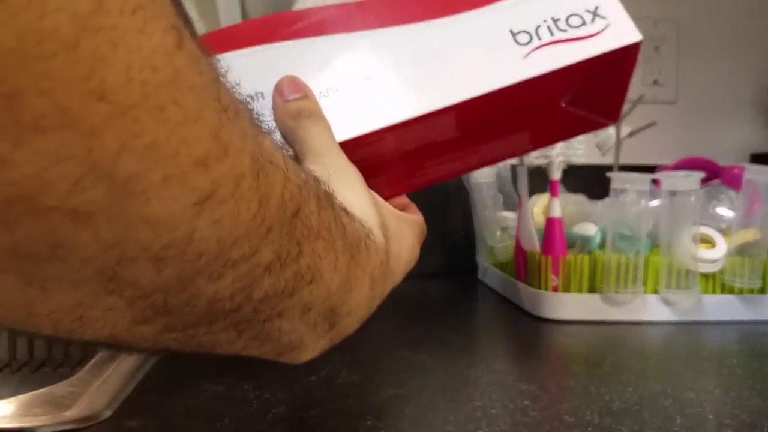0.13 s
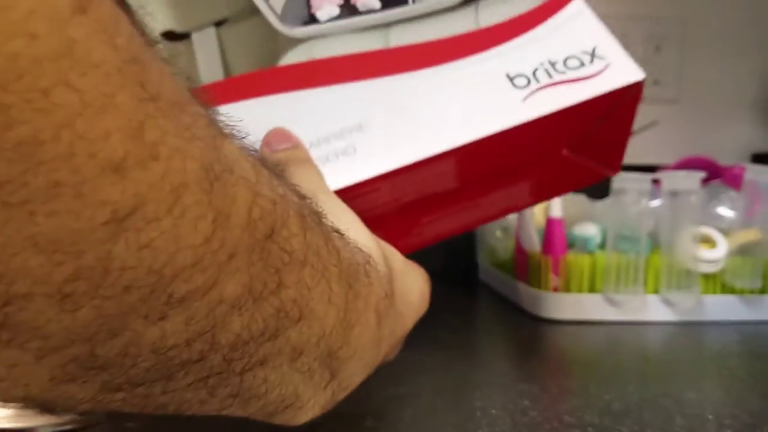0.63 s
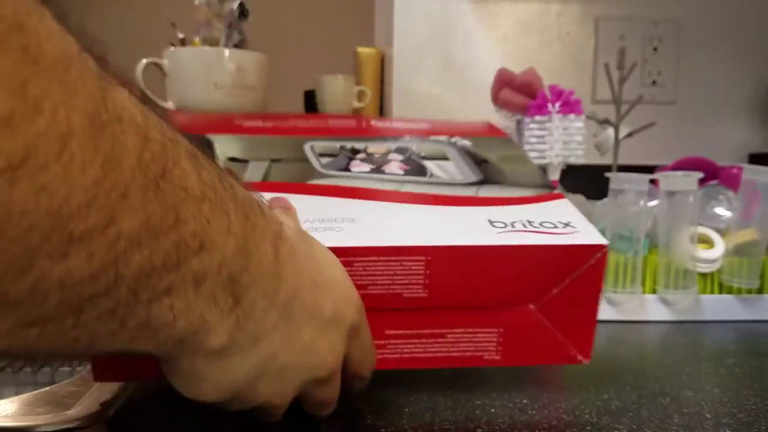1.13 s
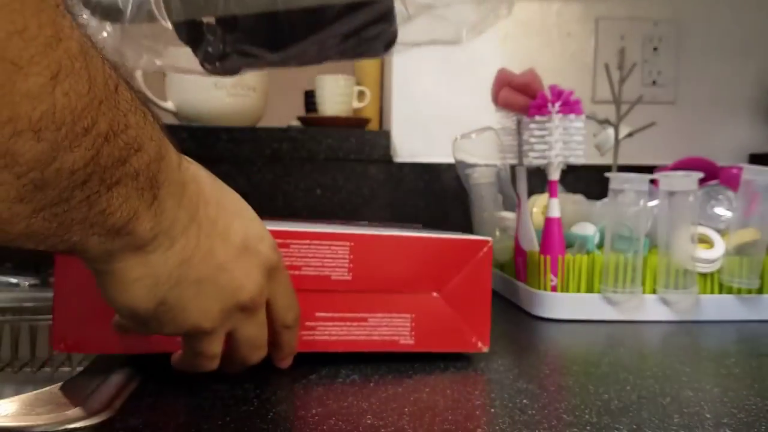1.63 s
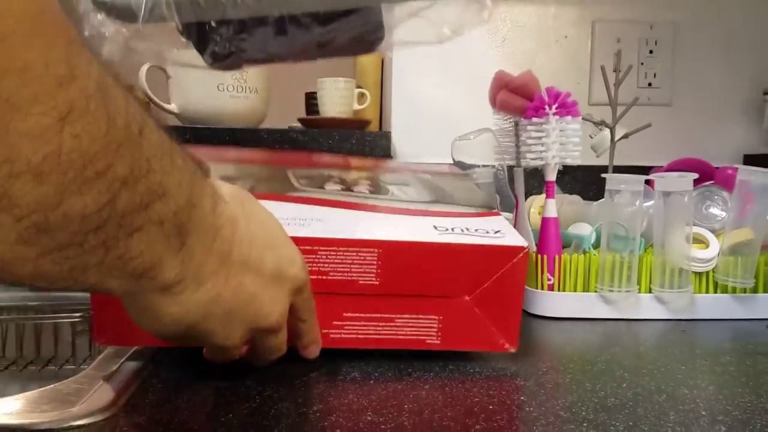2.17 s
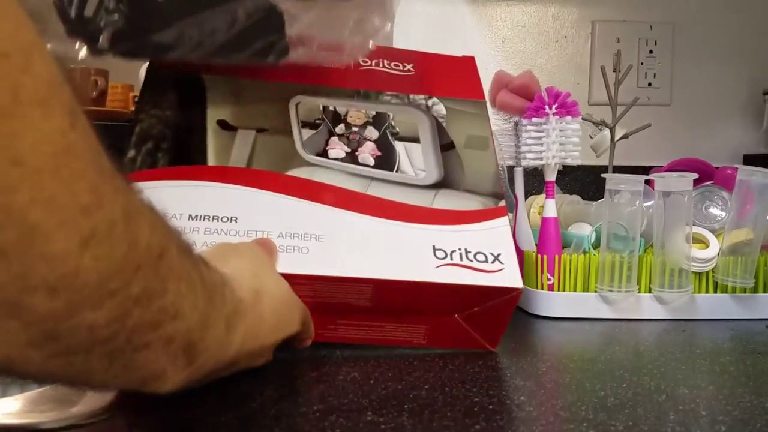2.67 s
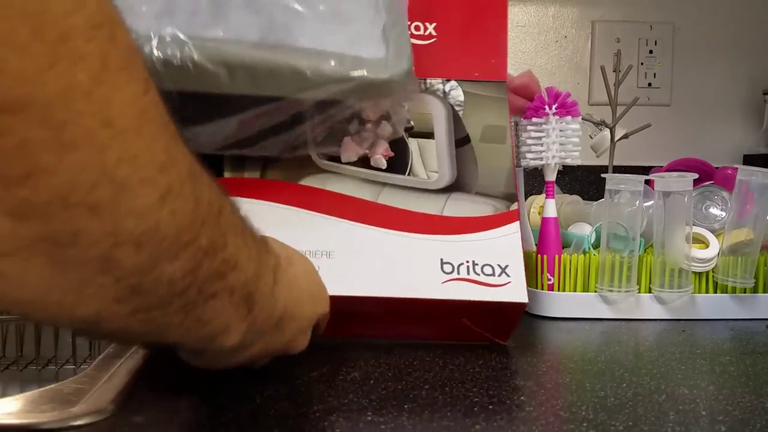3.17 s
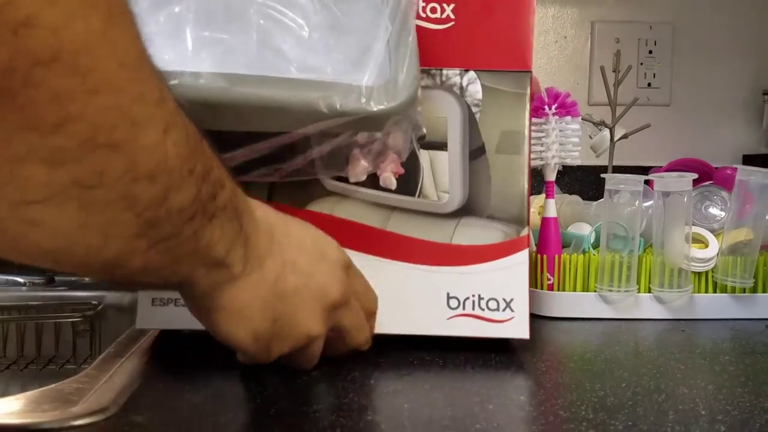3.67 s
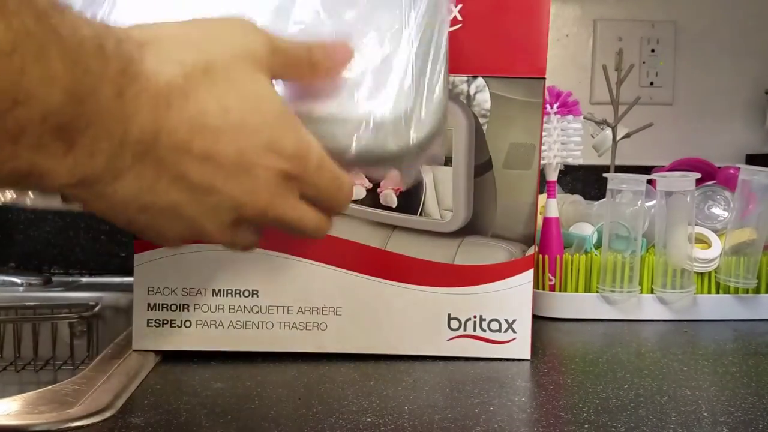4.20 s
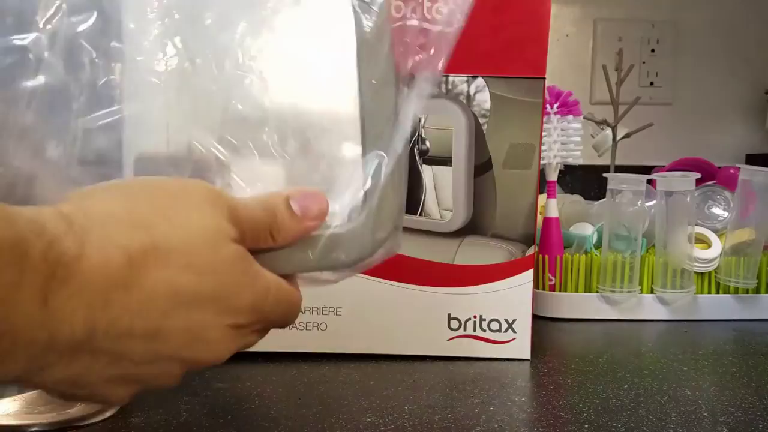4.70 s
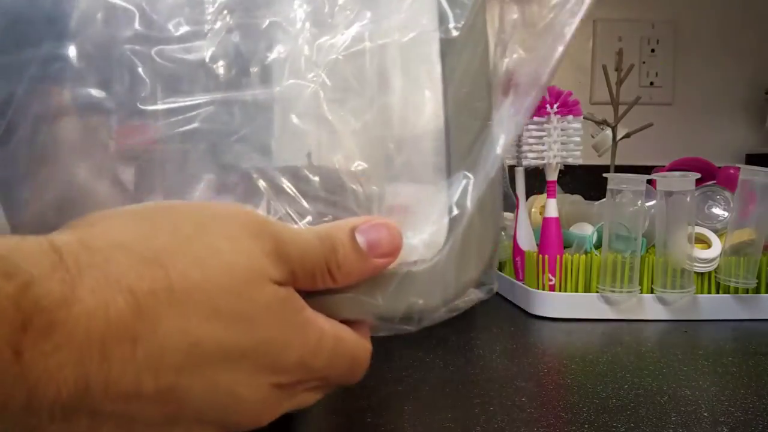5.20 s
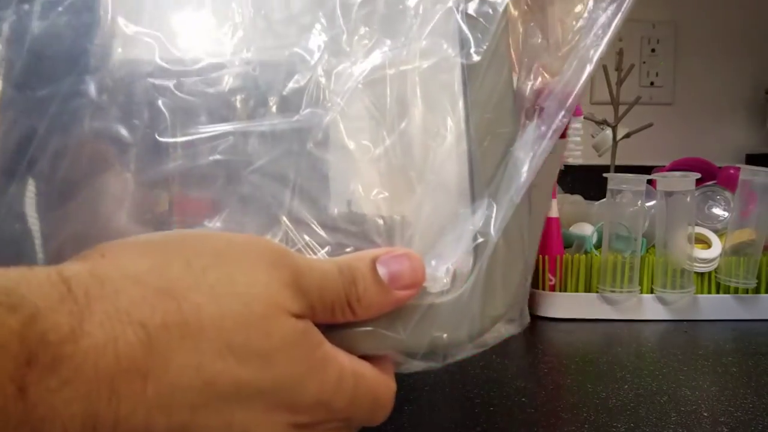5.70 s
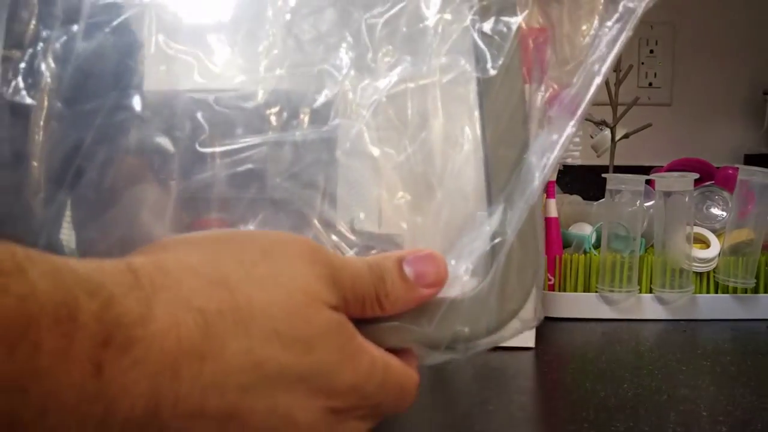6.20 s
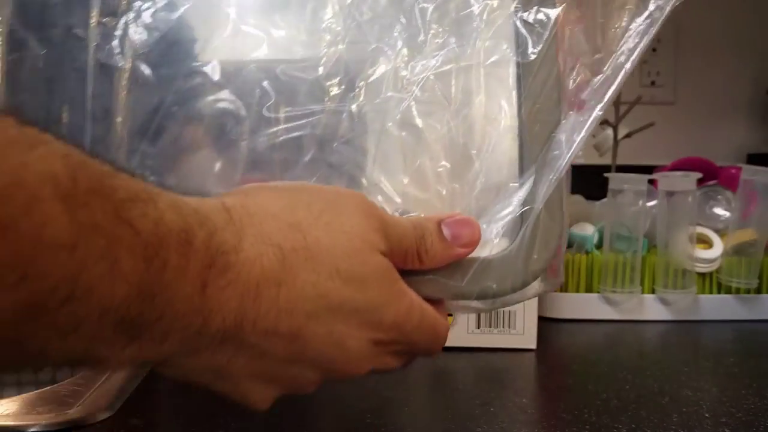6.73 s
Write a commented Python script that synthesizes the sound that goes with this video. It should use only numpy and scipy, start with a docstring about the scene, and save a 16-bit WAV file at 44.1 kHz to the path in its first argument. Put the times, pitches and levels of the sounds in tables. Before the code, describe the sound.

A cardboard box scrapes and knocks firmly onto a hard kitchen counter, then lighter taps, rubbing, crackling plastic film and one late hard knock.

```python
"""A cardboard box is slid off a bagged object, set down, tipped and nudged on a stone kitchen counter.
Sliding hiss and light knocks come first, then firm blows up to 1.8 s, from decaying sines of the box panels.
Quieter knocks and rubbing follow, as gritty noise through those modes; film snaps, short noise puffs,
crowd in from 4.1 to 4.9 s, and one more hard blow falls near 5.7 s before the handling dies down.
Stiff edges sing in filtered bursts; low noise rumbles, sparse echoes make the room, steady noise the hush."""
import sys
import numpy as np
from scipy import signal
from scipy.fft import rfft, irfft
from scipy.io import wavfile
from scipy.ndimage import uniform_filter1d

SR = 44100
rng = np.random.default_rng(int(sys.argv[2]) if len(sys.argv) > 2 else 0)


def boost(x):
    """Linear amplitude factor 10**(x/20) for a level x in decibels (scalar or array-like)."""
    u = np.asarray(x, float) / 20
    return 10 ** u


def master_out(mix):
    """Clip the mix to full scale and print it as 16-bit PCM to the path in sys.argv[1]."""
    frames = np.transpose(np.atleast_2d(mix))
    ceiling = np.clip(frames, -1, 1)
    pcm = np.round(ceiling * 32767).astype(np.int16)
    wavfile.write(sys.argv[1], SR, pcm)


N = 302085  # length in samples

# Panel and cavity modes of the box: mode_hz, relative level_db, longest t60_s
MODES = [(102, -15.5, 0.1), (128, -6, 0.037), (158.9, -15, .15), (207.7, -11, 0.11), (270, -7, 0.11),
         (324, -1, 0.045), (349.5, 1, 0.07), (393.2, 1, 0.077), (481.3, 5, 0.18), (488.7, 3.5, 0.16),
         (587, 5.5, 0.03), (700, -1, 0.14), (795, 3.5, 0.068), (880, 2.5, 0.038), (1025, 9, 0.014),
         (1194, 9.5, 0.12), (1206.5, 13.5, 0.015), (1404, 6, 0.051), (1597, 7, 0.025), (1735, 4.5, 0.047),
         (1956, 3.5, 0.025), (2050, -10, .03), (2128, 2.5, 0.019), (2540, 5, 0.04), (2595, 5, 0.041),
         (2986, -4.5, .02), (3350, -4.5, .02), (3530, -11.5, .012), (4300, -9, .008)]
# Blows on the box: start_s, panel level_db before the mix, thump_db and edge_db above the panel, favoured mode_hz
BLOWS = [(0.246, -36.5, 5, 0, 185), (0.368, -43, -9, -30, 405), (0.417, -34, -14, -4, 824),
         (0.452, -36, -7, -12, 330), (0.471, -17.5, -8.5, -12.5, 408), (0.641, -32.5, -11, -16, 384),
         (0.91, -26.5, -44, -2.5, 480), (1.04, -20, -9.5, -4.5, 293), (1.053, -25, -13, -4, 627),
         (1.081, -59, -29, -11, 473), (1.133, -26, -11, -6.5, 640), (1.168, -31.5, -7, -3, 344),
         (1.5, -11.5, -11.5, -2.5, 420), (1.515, -16.5, -10.5, 6, 554), (1.539, -21, -8, -13, 305),
         (1.64, -23, -8, -3, 436), (1.714, -27.5, -12, -2, 725), (1.739, -25.5, -34, -20, 490),
         (2.155, -52, -37, -2, 950), (2.223, -49, -9, -0.5, 885), (2.348, -37, -4.5, -2.5, 366),
         (2.413, -41, -6, -6, 595), (2.553, -54.5, 9, 14.5, 370), (2.768, -58.5, -14, 12, 895),
         (2.878, -66.5, -15, 18, 795), (2.918, -48.5, -28, -8, 750), (2.988, -36.5, -0.5, -5, 360),
         (3.057, -62, -15, 3, 587), (3.084, -35.5, -27, -2.5, 377), (3.281, -26.5, -12.5, -48, 464),
         (3.32, -37, -28, 0, 385), (3.402, -49.5, -1, 8, 388), (3.499, -48, -24, 3, 395),
         (3.557, -51, -19, 14, 870), (3.64, -41.5, -10.5, -13, 404), (3.665, -46.5, -20, -17, 413),
         (3.869, -49.5, -16, 10.5, 1720), (3.9, -47, -6.5, -30, 312), (4.009, -52, -3.5, -20, 600),
         (4.147, -43.5, -15, 12, 940), (4.212, -43.5, -31, 7.5, 940), (4.262, -41, -47, 1, 627),
         (4.288, -43.5, -34, 5, 750), (4.566, -47.5, -36, 15.5, 579), (4.76, -50, -24, 12, 855),
         (4.847, -37, -9, 2, 567), (4.871, -45, -29, -22, 533), (4.9, -39.5, -4.5, 1, 270),
         (4.964, -42.5, -22, -24, 409), (5.013, -31, -30, -12, 324), (5.13, -46, 5, 6, 466),
         (5.14, -28.5, -1.5, -26, 440), (5.165, -41.5, 8, -9, 128), (5.337, -40, 0.5, -29, 302),
         (5.365, -54, 11, -8.5, 128), (5.514, -51, -18, -21, 397), (5.684, -11, -54, -9, 470),
         (5.72, -18.5, -24, -24, 388), (5.749, -22.5, -48, -17, 473), (5.78, -37, -16, -23, 374),
         (6.15, -46, 6.5, -18, 143), (6.236, -48.5, 1.5, -15, 326)]
# Spectral shape of the plastic film's hiss: frequency_hz, relative density_db (per Hz)
FILM_SHAPE = [(2000, -1), (3400, -0.5), (5180, -5.5), (11200, -5), (14300, -6)]
# Left-right likeness, high in the bass: frequency_hz, likeness (0 to 1)
LIKENESS = [(60, 0.73), (300, 0.95), (700, 0.66), (1400, 0.15), (4000, .05)]


def evened(x):
    """Scales to rms 1."""
    return x / np.sqrt(np.mean(x ** 2) + 1e-20)


def smooth(x, size):
    """Two running means of size samples leave only slow movement."""
    return uniform_filter1d(uniform_filter1d(x, size=size), size=size)


def read(points, hz):
    """Reads a table on a log-frequency axis."""
    f, value = np.transpose(points)
    return np.interp(np.log(hz + 1), np.log(f + 1), value)


def colour(x, points):
    """Filters by a spectrum in dB, then scales to rms 1."""
    size = x.shape[-1]
    hz = np.fft.rfftfreq(size, 1 / SR)
    return evened(irfft(rfft(x) * boost(read(points, hz)), size))


def paired(pair):
    """Makes the right channel resemble the left in the bass."""
    size = pair.shape[1]
    same = np.clip(read(LIKENESS, np.fft.rfftfreq(size, 1 / SR)), 0, 1)
    left, other = rfft(pair)
    right = same * left + np.sqrt(1 - same ** 2) * other
    return irfft(np.array([left, right]), size)


def add(mix, start_s, sound):
    """Places a two-channel sound in the mix."""
    part = mix[:, round(start_s * SR):][:, :sound.shape[1]]
    part += sound[:, :part.shape[1]]


def grit(per_s, spread_db, clump_db):
    """Tiny catches of rough surfaces: sparse clicks of uneven size that swell in clumps, rms 1."""
    size = boost(spread_db * np.minimum(rng.exponential(1, (2, N)), 4))
    size *= rng.choice([-1., 1.], (2, N))
    clumps = evened(smooth(rng.standard_normal(N), 300))
    happens = rng.random((2, N)) < per_s / SR
    return evened(size * boost(clump_db * clumps) * happens)


def resonate(x, hz, width_hz):
    """A resonance of gain 1 that follows the curve hz: shift down, low-pass, shift back up."""
    turn = np.exp(2j * np.pi * np.cumsum(hz) / SR)
    r = np.exp(-np.pi * width_hz / SR)
    return 2 * (turn * signal.lfilter([1 - r], [1, -r], x / turn)).real


def rings(bend, turn):
    """One decaying sine per mode (bend: relative detuning by the grip, turn: phase); its share per region."""
    # centres of the thump, panel and edge regions: centre_hz
    region_hz = (150, 480, 1700)
    hz, db, t60_s = np.transpose(MODES)[:, :, None]
    t = np.arange(SR // 8) / SR
    share = np.array([read(list(zip(region_hz, row)), hz[:, 0]) for row in np.eye(3)])
    # neighbours swing in opposite sense, which fills the gaps between them
    share *= (-1.) ** np.arange(len(MODES))
    wave = np.sin(2 * np.pi * hz * (1 + bend[:, None]) * t + turn[:, None])
    wave *= 1 - np.exp(-t * hz * 4)  # the contact takes a quarter cycle
    most_cycles = 28  # card damps its ringing: caps each mode's t60
    decay_db = -60 * t / np.minimum(t60_s, most_cycles / hz)
    return boost(db + decay_db) * wave, share


def knocks():
    """A blow, then chatter of the loose flaps, rings the box; every spot of contact favours other modes."""
    chatter_db, chatter_fade_s = -38, 0.019  # fade is a time constant
    out, t = np.zeros((2, N)), np.arange(SR // 10) / SR
    hz = np.array(MODES)[:, 0]
    apart = np.arccos(np.clip(read(LIKENESS, hz), 0, 1)) / 2  # the ears meet the upper modes out of step
    spots = rng.standard_normal((len(BLOWS), 2, len(MODES)))
    chatter = rng.standard_normal((len(BLOWS), 2, len(t))) ** 3
    for (start_s, db, thump_db, edge_db, loud_hz), spot, shake in zip(BLOWS, spots, chatter):
        near = np.exp(-(np.log2(hz / loud_hz) / .3) ** 2)  # .3: width in octaves
        favour = boost(5 * near + 1.2 * spot[0])
        ears = [rings(0.029 * spot[1], side * apart) for side in (1, -1)]
        regions = np.array([(share * favour) @ ring for ring, share in ears])
        force = boost(chatter_db) * paired(shake) * np.exp(-t / chatter_fade_s)
        force[:, 0] = 1  # the blow itself
        regions = signal.fftconvolve(regions, force[:, None], axes=2)
        regions /= abs(regions).max(2).mean(0)[:, None]
        add(out, start_s, boost(db + np.array([thump_db, 0, edge_db])) @ regions)
    return out


def rubbing():
    """Gritty friction shakes the box modes; wide sliding surfaces hiss apart in the two ears."""
    (film, edge, panel), thump = strokes(), weight()
    ring, share = rings(*np.zeros((2, len(MODES))))
    catches = paired(grit(1500, 2.5, clump_db=1.0))
    # the edge contact is coloured by a wandering broad peak
    wander = evened(smooth(rng.standard_normal(N), 3000))
    scrape_hz = 1550 * np.exp(0.068 * wander)
    slips = np.gradient(grit(890, 1.3, clump_db=3.0), axis=1)
    scrape = resonate(resonate(slips, scrape_hz, width_hz=1000), scrape_hz, width_hz=1500)
    body = boost(-2.5) * edge * evened(scrape)
    for force, region in zip((thump, panel, boost(-5.0) * edge), share @ ring):
        response = region[None] / np.linalg.norm(region)
        body += signal.oaconvolve(force * catches, response, axes=1)[:, :N]
    creases = 0.37 * grit(110, 2.4, clump_db=3.0)  # sparse sharp crackles of the folding film
    rustle = grit(9000, 1.9, clump_db=1.0) + 0.95 * rng.standard_normal((2, N))
    hiss = colour(creases + rustle, FILM_SHAPE)
    return boost(-0.5) * body + boost(5.0) * film * hiss


def strokes():
    """Film, edge and panel gains: strokes rise, drift and fall, powers add; they stick and slip unevenly."""
    # slides of hand, card or bag: start_s, length_s, film level_db before the mix,
    # change_db by the end, panel_db above the film
    slides = [(0.0, 0.33, -57, -9, 8), (0.132, .11, -56.5, 6, 6), (0.448, 0.19, -43, -1, 8),
              (0.67, 0.26, -49.5, 6.5, 3), (1.09, 0.26, -64, -23, 13.5), (1.295, .18, -78.5, 5, 7.5),
              (1.524, 0.022, -45, -6.5, 8), (1.644, 0.021, -53.5, -7, -10), (1.721, 0.092, -56.5, -5.5, 10),
              (1.82, 0.03, -68, 3, 11.5), (1.873, 0.15, -58, 3.5, 6.5), (2.322, 0.16, -69, -3.5, 18.5),
              (2.514, 0.067, -60.5, 6.5, -0.5), (2.638, 0.2, -75.5, 1.5, 2), (2.951, 0.052, -50.5, -8, -5),
              (3.017, 0.13, -70, 2, 17), (3.102, 0.36, -61.5, 5.5, 4), (3.475, 0.23, -62, -1.5, 4),
              (3.871, 0.021, -61, -5.5, 1), (4.018, 0.075, -63.5, 5, 4.5), (4.156, 0.11, -52, -4, -0.5),
              (4.296, 0.18, -48, 8.5, -0.5), (4.48, 0.14, -48.5, -0.5, -4), (4.774, 0.025, -51, -9, -12),
              (4.802, 0.028, -71.5, 8, 15), (4.852, 0.075, -43, -14, -7), (4.97, 0.077, -66, -1.5, 13.5),
              (5.151, 0.071, -48.5, -11.5, 6), (5.24, 0.022, -63, -3.5, 7), (5.347, 0.15, -63, -8, 3),
              (5.52, 0.071, -63.5, -5.5, -1), (5.636, .04, -68, 6, 10), (5.694, 0.12, -47.5, -10, 4.5),
              (5.865, 0.083, -72.5, -6, 11), (6.155, 0.13, -71, -3.5, 12)]
    rise_db_per_s, fall_db_per_s = 598, 227.5  # a slide starts faster than it stops
    rest_db = -74.5  # resting hands still stir
    t = np.arange(0, N, 64) / SR
    start_s, length_s, db, change_db, panel_db = np.transpose(slides)[:, :, None]
    drift_db = change_db * np.clip((t - start_s) / length_s, 0, 1)
    before_db = rise_db_per_s * np.maximum(start_s - t, 0)
    after_db = fall_db_per_s * np.maximum(t - start_s - length_s, 0)
    film_db = db + drift_db - before_db - after_db
    judder = boost(1 * evened(smooth(rng.standard_normal((2, len(t))), 9)))  # 1 dB rms
    edge_db = 2.5 + 0.53 * panel_db  # edges scrape above the film, plus a share of the press on the panels
    gains = []
    for k, above_db in enumerate((0, edge_db, panel_db)):
        gain = np.sqrt((boost(film_db + above_db) ** 2).sum(0) + boost(rest_db) ** 2)
        gains.append(np.interp(np.arange(N) / SR, t, gain * judder[k % 2]))
    return gains


def weight():
    """Gain of the weight as the box is held and shifted in the hands."""
    # time_s, weight level_db before the mix
    shifts = [(0, -56.5), (.4, -60), (.57, -55), (.75, -52.5), (1.2, -53), (1.42, -66), (1.55, -58),
              (1.74, -63), (1.9, -97), (3.181, -58), (3.402, -67.5), (4.6, -88), (4.94, -66), (5.7, -74),
              (5.841, -59), (6.001, -78), (6.85, -74.5)]
    return boost(np.interp(np.arange(N) / SR, *np.transpose(shifts)))


def snaps():
    """Film and card edges snap: a sharp tick with a short puff of film hiss, each with its own treble tilt."""
    # start_s, level_db before the mix, treble tilt_db reached at 12 kHz
    snap_list = [(0.433, -50, -14), (0.9415, -24, 0), (1.0405, -48, -25), (1.112, -43.5, 22.5),
                 (1.167, -62, -20), (1.499, -19.5, 2), (1.5255, -33, -7), (1.5377, -30, 3), (1.64, -39, 0),
                 (1.713, -32.5, 8), (2.346, -47, 7), (2.533, -47, -27), (2.556, -38.5, -12),
                 (2.6741, -44.5, -6), (2.9517, -38, -8), (3.0584, -48, -17), (3.4029, -35, -6),
                 (3.533, -41, -20), (3.5602, -38, -18), (3.8716, -33, -16), (4.016, -54, 3),
                 (4.102, -41, -16), (4.147, -30, 3), (4.1596, -33, -9), (4.2006, -32.5, -10),
                 (4.2662, -30, 3), (4.278, -34, -25), (4.293, -34, 7), (4.3496, -28.5, -11),
                 (4.369, -25.5, 4), (4.4255, -36, -11), (4.497, -27, -5), (4.3995, -26, -7),
                 (4.468, -33, -12), (4.4798, -24.5, -12), (4.552, -49, -4), (4.568, -25, 4),
                 (4.589, -32, -20), (4.6473, -32, 7), (4.689, -36.5, -10), (4.7413, -35.5, 6),
                 (4.7598, -33.5, -1), (4.8477, -23.5, 3), (5.0785, -44, -13), (5.1336, -30, -4),
                 (5.2435, -38.5, -17), (5.529, -44, -26), (5.685, -38.5, -20)]
    out, t = np.zeros((2, N)), np.arange(4096) / SR
    tick_fade = np.exp(-t / 0.0002)
    puff_fade = boost(-60 * t / 0.076)  # t60 in s
    puffs = colour(rng.standard_normal((len(snap_list), 2, len(t))), FILM_SHAPE)
    for (start_s, db, tilt_db), puff in zip(snap_list, puffs):
        puff = colour(puff, [(7000, 0.0015), (12000, tilt_db)])
        tick = .6 * tick_fade * puff[0]  # the same in both ears
        add(out, start_s, boost(db) * (tick + 0.22 * puff_fade * puff))
    return out


def scuffs():
    """One stiff edge sings briefly: a gritty burst through one broad resonance."""
    # start_s, level_db before the mix, pitch_hz
    scuff_list = [(0.4239, -30, 2730), (0.519, -25, 2520), (0.5794, -32, 2290), (0.9265, -30, 2640),
                  (1.887, -34.5, 2340), (1.9578, -30, 2140), (2.0274, -41, 1880), (3.307, -35, 2730),
                  (3.321, -46, 2760), (3.4498, -40, 1850), (3.6412, -37, 2450), (3.687, -45.5, 3170),
                  (4.847, -21, 2640), (4.852, -32, 3250), (4.8794, -43, 2870), (4.9197, -46, 2730),
                  (5.077, -40, 2040), (5.246, -45, 2700)]
    width_hz, rise_s, fade_s = 620, 0.002, 0.032
    out, t = np.zeros((2, N)), np.arange(SR // 5) / SR
    envelope = (1 - np.exp(-t / rise_s)) * np.exp(-t / fade_s)
    bursts = rng.standard_normal((len(scuff_list), 2, len(t))) ** 3
    for (start_s, db, pitch_hz), burst in zip(scuff_list, bursts):
        curve = pitch_hz + 0 * t
        sung = resonate(resonate(burst, curve, width_hz), curve, width_hz)
        add(out, start_s, boost(db) * sung / abs(sung).max() * envelope)
    return out


def rumble():
    """The counter under the weight: deep noise that follows its shifts and booms after each blow."""
    # frequency_hz, relative density_db (per Hz)
    rumble_shape = [(15, -29.5), (35, -16), (60, -7.5), (85, 0), (125, -6), (220, -48.5)]
    thump_share_db, panel_share_db, fade_s = -18, -31, 0.028  # the boom's drive by thump and panel strength
    blows = np.zeros(N)
    for start_s, db, thump_db, *_ in BLOWS:
        drive = np.hypot(boost(thump_share_db + thump_db), boost(panel_share_db))
        blows[round(start_s * SR)] = boost(db) * drive
    boom = signal.lfilter([1], [1, -np.exp(-1 / (SR * fade_s))], blows)
    noise = colour(paired(rng.standard_normal((2, N))), rumble_shape)
    return (boost(-11) * weight() + boom) * noise


def kitchen(x):
    """A small hard room: sparse echoes of random sign, each band dying at its own speed."""
    # frequency_hz, t60_s
    decay_times = [(100, 0.68), (300, 0.22), (800, 0.39), (2000, 0.34), (5000, 0.5), (12000, 0.42)]
    taps = np.zeros((2, SR // 2))
    at = np.arange(200, SR // 2 - 20, 20) + rng.integers(0, 20, (2, (SR // 2 - 201) // 20))
    np.put_along_axis(taps, at, rng.choice([-1., 1.], at.shape), 1)
    hz, t, z = signal.stft(paired(taps), SR, nperseg=256)
    fade = boost(-60 * t / read(decay_times, hz)[:, None])
    tail = signal.istft(z * fade, SR, nperseg=256)[1]
    return signal.oaconvolve(x.mean(0)[None], tail / np.linalg.norm(tail[0]), axes=1)[:, :N]


def hush():
    """Steady room tone and microphone hiss: coloured noise, alike in the bass."""
    # frequency_hz, relative density_db (per Hz)
    hush_shape = [(15, -31.5), (25, -5), (33, -25.5), (60, 0), (169, -12.5), (204, -23), (227, -13),
                  (477, -2.5), (711, -9), (4440, -19), (6980, -32), (9100, -22), (14300, -17)]
    return boost(-67) * colour(paired(rng.standard_normal((2, N))), hush_shape)


def scene():
    """Blows, snaps, scuffs and rubbing with their echoes, over the rumble and the room tone."""
    # a small box sends out little deep bass: frequency_hz, gain_db
    radiation = [(20, -21), (60, -11.5), (110, -0.5)]
    blows, rub = knocks() + snaps() + scuffs(), rubbing()
    echoes = kitchen(boost(-5.0) * blows + boost(-23.5) * rub)
    box = boost(3.0) * blows + rub + echoes
    gain = boost(read(radiation, np.fft.rfftfreq(N, 1 / SR)))
    return irfft(rfft(box) * gain, N) + rumble() + hush()


def band_limit(x):
    """A steep low-pass at the top of the band."""
    return signal.sosfilt(signal.butter(12, 15890, fs=SR, output="sos"), x)


def record(dry):
    """The treble falls away above 14.3 kHz, the left port is louder and the converter sits slightly off zero."""
    # steep loss of the highest treble: frequency_hz, gain_db
    top_cut = [(12000, -2), (14300, -0.5), (14900, -17.5), (16000, -44)]
    # lean of the two ports: frequency_hz, left over right_db
    port_lean = [(100, 2.5), (3000, 0.6), (13000, 2.5)]
    hz = np.fft.rfftfreq(N, 1 / SR)
    ports = boost(read(top_cut, hz) + np.outer([.5, -.5], read(port_lean, hz)))
    offset = -.0005  # of full scale
    mix = irfft(rfft(dry) * ports, N) + offset
    return band_limit(mix)


dry = scene()
out = record(dry)
master_out(out)
```